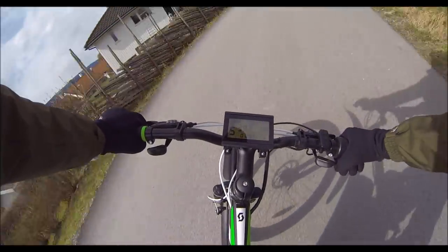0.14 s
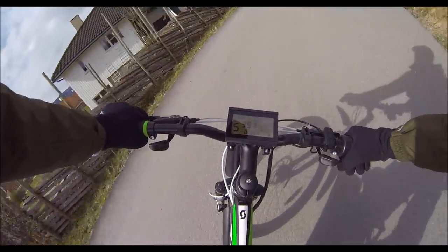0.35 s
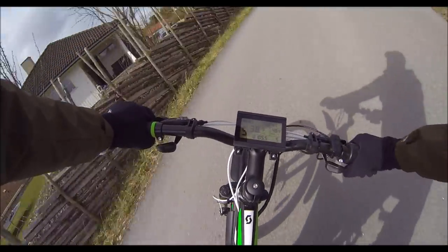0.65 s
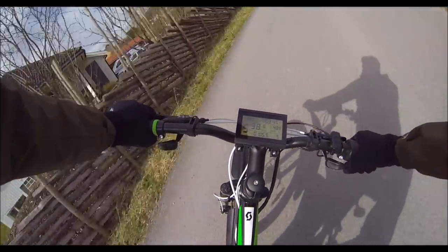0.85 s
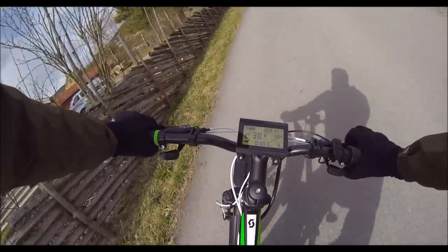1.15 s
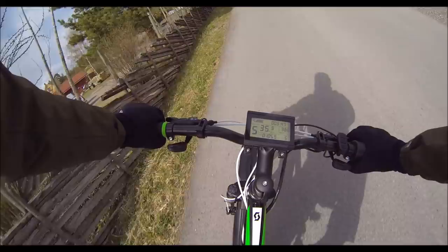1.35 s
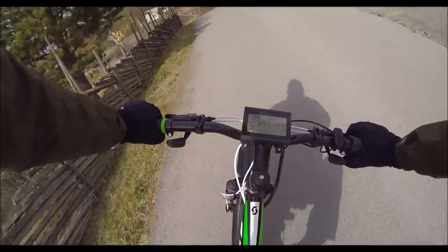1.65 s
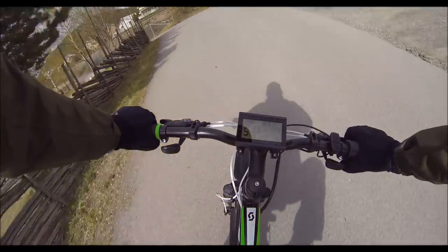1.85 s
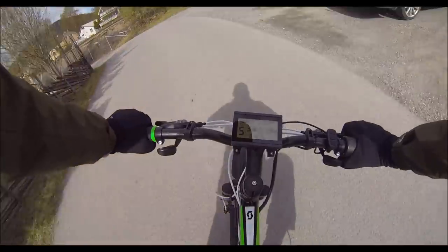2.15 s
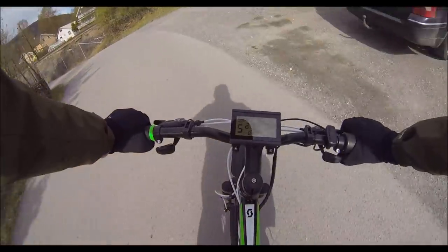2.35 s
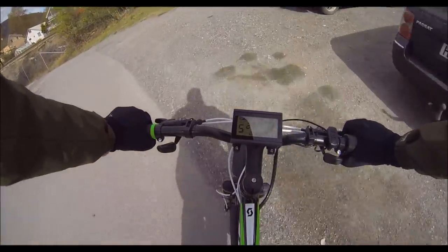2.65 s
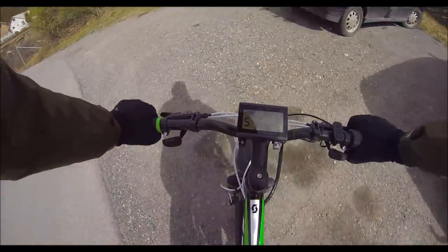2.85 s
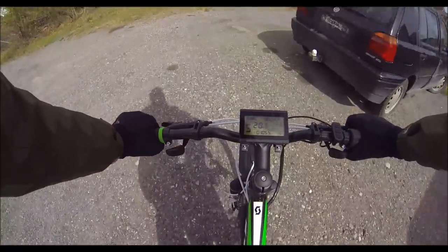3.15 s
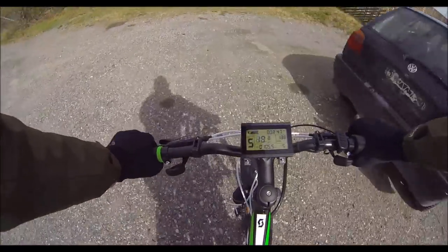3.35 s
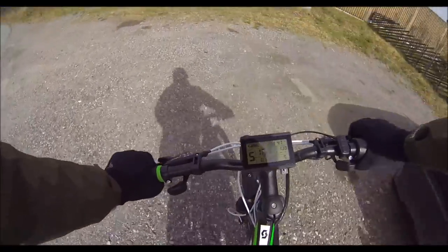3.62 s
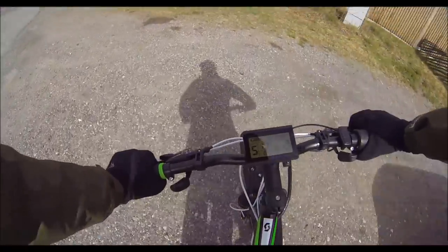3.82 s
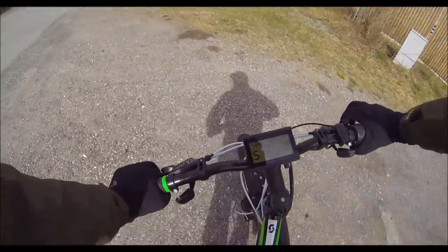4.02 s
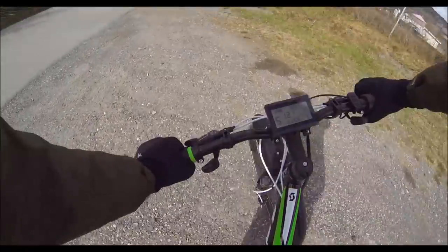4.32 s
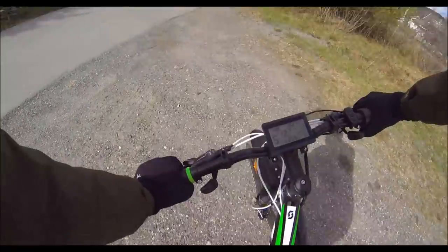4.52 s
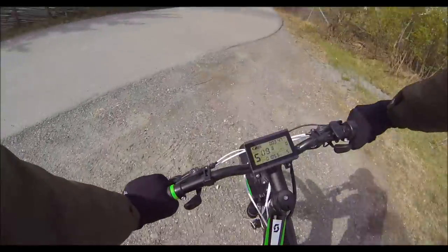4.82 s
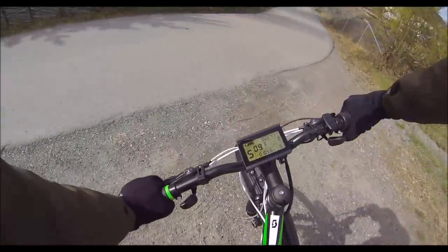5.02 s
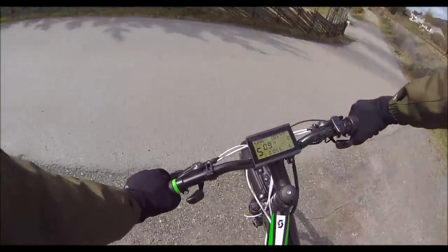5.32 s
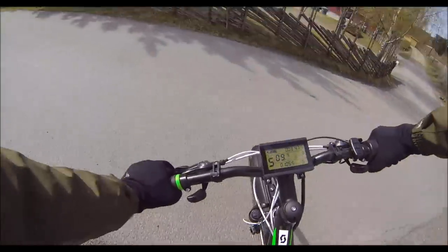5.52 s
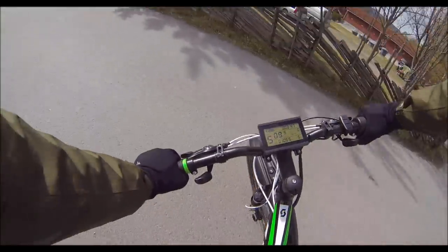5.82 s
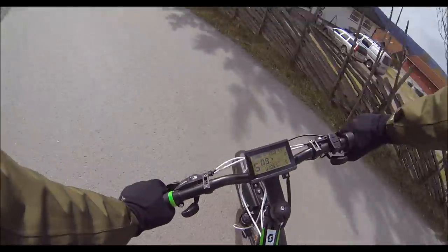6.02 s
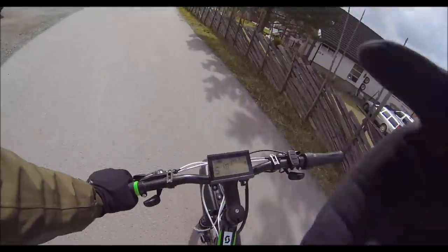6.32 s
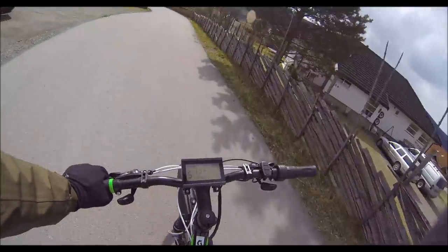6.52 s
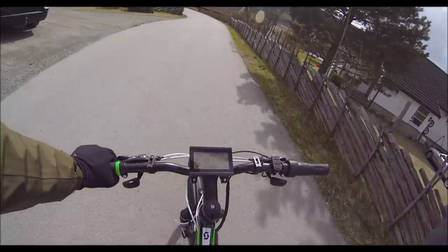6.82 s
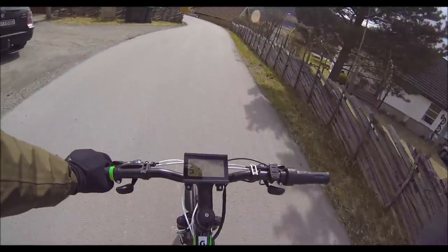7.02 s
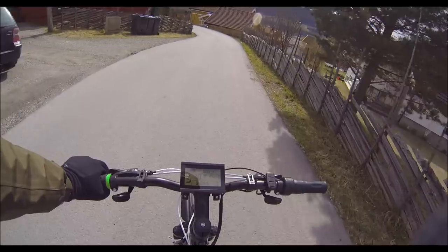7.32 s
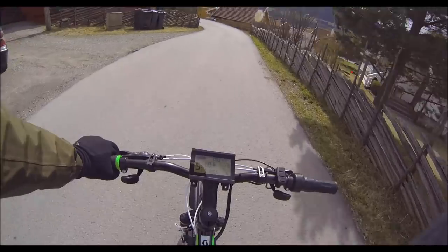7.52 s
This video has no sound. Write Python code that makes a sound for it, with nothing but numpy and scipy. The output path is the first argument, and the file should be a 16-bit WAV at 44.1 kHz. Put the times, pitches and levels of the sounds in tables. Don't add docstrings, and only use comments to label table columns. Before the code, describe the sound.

From the start, deep irregular wind buffeting and a soft gusty roar press on a sealed plastic case worn on a cyclist's chest, over a boxy, mid-range tyre and motor buzz, faint airy hiss and a very faint pulsing high electronic whistle. Small frame knocks come at 1.3-1.7 seconds. From 1.9 to 2.7 the brakes sing in thin, juddering squeals with tiny upward-sliding chirps. At 2.85-3.2 a sharp knock and heavy, deep jolts mark rough gravel; brighter stony crackle and fork rattle follow, with squeaks near 3.6 and a clearer one at 4.0. Scattered knocks continue through 6.6. Then dry glove scrapes begin, a tap lands at 6.9, a hard cracking thump at 6.98, a low press at 7.07 and another huge thump at 7.26. Buzz turns muffled, with faint taps and a final rub at 7.65.

```python
import sys
import numpy as np
from scipy import signal
from scipy.io import wavfile
from scipy.ndimage import uniform_filter1d

SR = 44100
rng = np.random.default_rng(int(sys.argv[2]) if len(sys.argv) > 2 else 0)


def magnitude_from_level(level_db):
    exponent = np.asarray(level_db, float) / 20
    return 10 ** exponent


def inscribe(sig):
    pcm = np.round(np.clip(np.atleast_2d(sig).T, -1, 1) * 32767)
    wavfile.write(sys.argv[1], SR, pcm.astype(np.int16))


N = 337806

# time in seconds, gust strength in dB, airspeed in dB.
WIND_GUSTS = [(0.0, -31.5, 8.5), (0.42, -37.5, 4), (0.62, -35, 7), (1.2, -42, 4.5), (1.66, -30, 4.5),
              (2.05, -39, -0.5), (2.4, -33.5, 1), (2.72, -45.5, -3), (3.01, -25.5, 1.5), (3.5, -37, -1),
              (3.8, -32.5, -0.5), (4.35, -44, -2.5), (4.88, -34, 6), (5.25, -30, -2.5), (5.85, -41.5, 2),
              (6.61, -38.5, 7), (7.12, -39.5, 0.5), (7.66, -32, -5)]
# frequency in Hz, density in dB per Hz.
BUFFET_SPECTRUM = [(7.1, -27), (12, 6), (32, 0.5), (41, -5.5), (54, -15), (85, -20.5), (160, -38),
                   (210, -46.5), (350, -120)]
# frequency in Hz, density in dB per Hz.
ROAR_SPECTRUM = [(41, -39.5), (70, 2), (141, -4), (233, -15), (302, -13.5), (421, -22.5), (624, -29),
                 (1200, -31), (1560, -43), (2640, -120)]
# frequency in Hz, density in dB per Hz.
SEAM_SPECTRUM = [(3500, -22.5), (5200, -3), (5900, -5.5), (6500, -0.5), (7200, -7), (7800, -1),
                 (8600, -12.5), (11000, -11.5), (13200, -17), (14500, -14)]
# time in seconds, shaking in dB, looseness from 0 to 1.
ROAD_SURFACE = [(0.0, -55, 0.17), (0.7, -56, 0), (1.56, -57.5, 0.38), (2.4, -63, 0.66), (2.84, -63, 0.65),
                (2.885, -52, 0.52), (3.318, -59, 0.77), (3.704, -57.5, 0.62), (3.99, -64.5, 0.72),
                (4.302, -60, 0.67), (4.65, -63.5, 0.84), (4.92, -52, 0.81), (5.2, -63, 0.88),
                (5.6, -59, 0.66), (5.69, -65.5, 0.81), (6.04, -58.5, 0.72), (6.13, -65, .4),
                (6.43, -58, 0.82)]
# frequency in Hz, width in Hz, level in dB.
CASE_MODES = [(704, 87, -12.5), (1000, 96, -11.5), (1386, 235, -1.5), (1570, 192, 4), (1910, 210, -8.5),
              (2196, 440, -10.5), (2700, 800, -18), (3417, 710, -13), (4040, 930, -24.5),
              (4830, 940, -23.5), (6620, 1600, -38.5)]
# time in seconds, level in dB, fork ring in dB, low bump in dB.
FRAME_KNOCKS = [(1.2974, -45, -20, -12), (1.5046, -43, -20, -15), (1.6222, -42.5, -18, 2.5),
                (2.8487, -28.5, -3.5, -17), (3.0098, -46, -11, 11), (3.1448, -46, -2.5, -10),
                (3.2047, -40, -7, -15), (3.2678, -34, -11, -14), (3.6377, -41.5, -24, -22),
                (3.6693, -46, -20, -11), (3.851, -45, -6, 1), (3.923, -49, 3, -12), (4.0595, -41, -24, -29),
                (4.1853, -42, 6, -12), (4.393, -46, -3, -7), (4.8468, -48, -14, 10),
                (4.9233, -40.5, -14, 8.5), (5.1432, -44.5, -5, -6), (5.3044, -60, -5, 14),
                (5.426, -44, 2.5, -17), (5.605, -45, -5, -4), (6.0476, -40, -21, 10.5),
                (6.2538, -39, -29, 2), (6.4138, -45.5, -15, -5), (6.501, -43, -14, 6.5),
                (6.567, -52, -10, 20), (6.641, -40, -9, -26.5)]
# start in seconds, length in seconds, level in dB.
BRAKE_SQUEALS = [(1.963, 0.23, -60), (2.22, .06, -54), (2.298, 0.11, -57), (2.52, 0.2, -69),
                 (3.1, 0.11, -60.5), (3.254, 0.21, -61), (3.52, .18, -63.5), (3.76, .03, -62.5),
                 (3.896, .1, -66), (4.02, 0.079, -62.5)]
# peak in seconds, level in dB, pitch in Hz, glide in Hz per second.
PAD_SQUEAKS = [(1.89, -68, 12300, 5000), (1.92, -58, 12600, 5000), (2.11, -68, 12600, 3000),
               (2.137, -72, 13100, 5000), (2.2, -77, 14000, 9000), (2.411, -71, 13110, 9000),
               (2.46, -70, 13900, 3000), (2.5, -66, 13950, 7000), (2.53, -74, 14350, 3000),
               (2.626, -73, 13340, 12000), (2.733, -64, 13230, 3000), (2.776, -76, 13870, 8900),
               (3.153, -66, 13200, 100), (3.568, -51.5, 13200, 2000), (3.624, -61, 13460, 2000),
               (3.708, -74, 13720, 9000), (3.74, -68, 14350, 3000), (3.768, -65, 13950, 6000),
               (3.97, -46.5, 10580, 100), (4.061, -61, 10700, 12000), (4.085, -68, 11500, 5000)]
# time in seconds, change in dB of the shaking that gets through.
GLOVE_GRIP = [
    (6.95, 2),
    (6.99, 8),
    (7.124, 0),
    (7.254, -3.5),
    (7.4, -9),
    (7.62, -4),
]
# start in seconds, length in seconds, level in dB, relative grit in dB.
GLOVE_SCRAPES = [
    (6.64, 0.021, -34, -17),
    (6.703, 0.043, -32, -16),
    (6.8, 0.012, -28.5, -12.5),
    (6.883, 0.046, -34.5, -17.5),
    (7.65, .1, -33, -16),
]
# frequency in Hz, density in dB per Hz.
RUB_SPECTRUM = [(500, -29.5), (760, -19), (1130, -24), (1380, 1.5), (2050, -4), (2500, -14), (3000, -28),
                (5000, -50)]
# frequency in Hz, density in dB per Hz.
GRIT_SPECTRUM = [(2000, -39), (2900, -14), (3400, 1.5), (4300, -9), (5100, -9.5), (5600, -21), (6200, -10),
                 (8000, -33.5)]
# frequency in Hz, density in dB per Hz.
FIZZ_SPECTRUM = [(5000, -25), (7000, -5), (8000, -2), (9000, -9), (10500, -5), (13000, -18), (15000, -24)]
# time in seconds, level in dB, wall pitch in Hz, wall bump in dB.
FINGER_TAPS = [
    (6.8956, -24, 300, 2),
    (7.0683, -43, 229, 17.5),
    (7.1017, -39, 710, 3),
    (7.218, -34, 700, 7),
    (7.235, -48, 589, 8),
    (7.3124, -61, 700, 17),
    (7.3574, -51.5, 695, 10),
    (7.423, -54, 343, 7),
]
# time in seconds, level in dB, rise in ms, hold in ms, fall in ms.
AIR_PUSHES = [
    (2.874, -13.5, 10, 1.6, 3.3),
    (3.136, -8.5, 14, 3.8, 9.4),
    (6.8956, -13.5, 0.3, 0.11, 0.99),
    (6.9783, -1.5, 0.72, 0.32, 1.83),
    (7.064, -15, 7.47, 0.72, 1.1),
    (7.2559, -1, 1.34, 0.11, 1.17),
]
# time in seconds, level in dB, pitch in Hz, 60 dB decay in seconds.
WALL_SWINGS = [(2.889, -12.5, 30.3, 0.38), (3.01, -36, 16, 0.079), (3.105, -7, 11.4, 0.28),
               (3.16, -13, 19, 0.17), (5.76, -31.5, 110, 0.064), (6.045, -27.5, 99, 0.08),
               (6.565, -26, 73, 0.097), (6.63, -25.5, 74, 0.17), (6.899, -15, 72, 0.052),
               (6.982, -10.5, 49, 0.075), (7.072, -2, 34.2, 0.12), (7.259, 0.5, 39.6, 0.14)]
# time in seconds, ring in dB, ring pitch in Hz, ring decay in ms, crack in dB.
CASE_SLAPS = [(1.7399, -42.5, 3450, 3.2, -62), (1.305, -53, 4900, 1.8, -70), (3.0107, -30, 316, 3.3, -69),
              (5.305, -38.5, 298, 4.3, -75), (6.9784, 4, 2750, 0.33, -39), (6.9798, -1.5, 1500, 1.4, -60),
              (6.9796, -21, 760, 2.2, -70), (6.9802, -22, 4060, 1, -60), (7.2555, -18, 1000, 0.84, -60),
              (7.2565, -14.5, 1506, 2.1, -58), (7.2553, -36, 2400, 1.2, -40.5),
              (7.2798, -39, 3100, 1.1, -35)]
TREBLE_GAPS = [.355, .528, .866, 2.073, 2.465, 2.53, 2.724, 3.237, 3.98, 4.174, 4.28, 4.51, 5.22, 6.565]

CALM_DB = -58


def evened(x):
    return x / np.sqrt(np.mean(x ** 2) + 1e-20)


def read(points, hz):
    f, value = np.transpose(points)
    return np.interp(np.log(hz + 1), np.log(f + 1), value)


def along(rows, t):
    s, *columns = np.transpose(rows)
    return [np.interp(t, s, c) for c in columns]


def add(mix, s, sound):
    part = mix[round(s * SR):][:len(sound)]
    part += sound[:len(part)]


def drift(width, size=N):
    once = uniform_filter1d(rng.standard_normal(size), int(width))
    return evened(uniform_filter1d(once, int(width)))


def above(x, hz, order=2):
    return signal.sosfiltfilt(signal.butter(order, hz, "high", fs=SR, output="sos"), x)


def during(t, spans, ramp):
    inside = np.any([(t > a) & (t <= b) for a, b in spans], axis=0)
    return uniform_filter1d(1. * inside, int(ramp))


def surge(t, start, length, db, rise, fall):
    return db - rise * np.maximum(start - t, 0) - fall * np.maximum(t - start - length, 0)


def coloured(x, gain_db):
    hz = abs(np.fft.fftfreq(16384, 1 / SR))
    log_gain = np.log(magnitude_from_level(np.maximum(gain_db(hz), -100)))
    taps = np.fft.ifft(np.exp(np.conj(signal.hilbert(log_gain)))).real[:8192]
    lead = 8192 * (len(x) == N)
    return signal.oaconvolve(np.r_[x[len(x) - lead:], x], taps)[lead:lead + len(x)]


def case_db(hz):
    power = sum(magnitude_from_level(2 * db) / (1 + (2 * (hz - f) / w) ** 2) ** 2.11 for f, w, db in CASE_MODES)
    return 10 * np.log10(power)


def through_case(drive, bright_db):
    body = evened(coloured(drive, case_db))
    return body + (magnitude_from_level(bright_db) - 1) * above(body, 3480)


def ground(t):
    level_db, loose = along(ROAD_SURFACE, t)
    return level_db + along(GLOVE_GRIP, t)[0], loose


def electronics(t):
    hiss = magnitude_from_level(-80.5) * rng.standard_normal(N)
    pulses = np.exp(2.37 * np.cos(2 * np.pi * (24.0 * t + 0.33)) - 2.5)
    whistle = np.sin(2 * np.pi * np.cumsum(11150 + 120 * drift(60)) / SR)
    trace = magnitude_from_level(-101) * np.sin(2 * np.pi * 9090 * t)
    return hiss + magnitude_from_level(-79.5) * pulses * whistle + trace


def wind(t):
    buffet_db, speed_db = along(WIND_GUSTS, t)
    buffet = evened(coloured(rng.standard_normal(N), lambda hz: read(BUFFET_SPECTRUM, hz)))
    gusts = magnitude_from_level(2.0 * drift(1600) + 2.63 * drift(360))
    roar = evened(coloured(rng.standard_normal(N) * gusts, lambda hz: read(ROAR_SPECTRUM, hz)))
    shaking_db = along(ROAD_SURFACE, t)[0] - CALM_DB
    roar_db = -55 + speed_db + 0.32 * shaking_db
    return magnitude_from_level(buffet_db + 5.5) * buffet + magnitude_from_level(roar_db + 5.5) * roar


def air(t):
    db = -76 + 0.091 * along(WIND_GUSTS, t)[1] + 0.3 * (ground(t)[0] - CALM_DB)
    db += .6 * np.minimum(along(GLOVE_GRIP, t)[0], 0)
    rush = rng.standard_normal(N) * magnitude_from_level(2.4 * drift(990))
    return magnitude_from_level(db + 3.5) * evened(coloured(rush, lambda hz: read(SEAM_SPECTRUM, hz)))


def grit(per_s, spread_db, length):
    hits = rng.random(N) < per_s / SR
    size = magnitude_from_level(spread_db * np.minimum(rng.exponential(1, N), 4)) * hits
    envelope = signal.oaconvolve(size, np.exp(-np.arange(600) / length))[:N]
    return evened(envelope * rng.standard_normal(N))


def road(t):
    level_db, loose = ground(t)
    bright_db = -13.5 + 21.5 * loose - 0.37 * (level_db - CALM_DB)
    rattle_db = level_db - 30 + 27.5 * loose
    stones = np.clip(.2 + .3 * loose, 0, .9)
    buzz = rng.standard_normal(N) * magnitude_from_level(1.8 * drift(740))
    drive = np.sqrt(1 - stones ** 2) * evened(buzz) + stones * grit(120, 5.6, 140)
    rattle_hz, width_hz = 2340, 380
    fork = evened(coloured(drive, lambda hz: -20 * np.log10(1 + (2 * (hz - rattle_hz) / width_hz) ** 2)))
    return magnitude_from_level(level_db + 1.2) * through_case(drive, bright_db) + magnitude_from_level(rattle_db - 2.0) * fork


def knock(s, db, fork_db, low_db, bump_hz=247):
    t = np.arange(2000) / SR
    fading = np.exp(-t / .0035) * np.tanh(t / .001)
    phase = rng.random(3)
    upper_db = -7.5 + 0.75 * fork_db
    modes = [(1522 + 67 * rng.standard_normal(), 0), (2298, fork_db), (3350, upper_db)]  # Hz, dB
    ring = sum(magnitude_from_level(d) * np.sin(2 * np.pi * (f * t + p)) for (f, d), p in zip(modes, phase))
    rattle = through_case(rng.standard_normal(len(t)) * fading, upper_db + 15.5)
    bump = np.sin(2 * np.pi * bump_hz * t) * np.exp(-t * bump_hz / 1.3)
    return s - .001, magnitude_from_level(db + 3.0) * (1.03 * ring * fading + 0.074 * rattle + magnitude_from_level(low_db - 3.0) * bump)


def squeal(t):
    bite_db_per_s, let_go_db_per_s = 250, 300
    db = np.max([surge(t, *row, bite_db_per_s, let_go_db_per_s) for row in BRAKE_SQUEALS], axis=0)
    depth = .5 + .25 * drift(3000)
    judder = 1 + depth * np.cos(2 * np.pi * np.cumsum(52 + 10 * drift(2000)) / SR)
    turns = np.cumsum(2224 + 9 * drift(890) + 12 * drift(146)) / SR
    waver_db = 2.5 * drift(700)
    return np.sqrt(2) * magnitude_from_level(db + waver_db) * judder * np.sin(2 * np.pi * turns)


def squeak(s, db, hz, glide):
    t = np.arange(-.06, .06, 1 / SR)
    turns = np.cumsum(hz + glide * t + 80 * drift(60, size=len(t))) / SR
    flutter = magnitude_from_level(3.1 * drift(80, size=len(t)))
    level_db = surge(t, 0, .002, db - 1, 1400, 1000)
    return s + t[0], np.sqrt(2) * magnitude_from_level(level_db) * flutter * np.sin(2 * np.pi * turns)


def scrapes(t):
    slips = .7 * rng.standard_normal(N) * magnitude_from_level(2.5 * drift(200)) + .45 * grit(900, 3, 50)
    hiss = rng.standard_normal(N) * magnitude_from_level(1.9 * drift(150))
    tones = [(slips, RUB_SPECTRUM), (slips, GRIT_SPECTRUM), (hiss, FIZZ_SPECTRUM)]
    layers = [evened(coloured(x, lambda hz: read(tone, hz))) for x, tone in tones]
    slide_in, slide_out, last_in = 450, 333, 498
    rises = [slide_in * 3] + [slide_in] * (len(GLOVE_SCRAPES) - 2) + [last_in]
    shapes = np.array([surge(t, s, length, 0, rise, slide_out)
                       for (s, length, *_), rise in zip(GLOVE_SCRAPES, rises)])
    *_, db, grit_db = np.transpose(GLOVE_SCRAPES)[:, :, None]
    first = GLOVE_SCRAPES[0][0]
    worn_db = 20 * np.clip(t - first, 0, .35)
    fizz_db = -56.5 + 0.83 * shapes.max(0) - worn_db
    levels = [(shapes + db).max(0), (shapes + db + grit_db).max(0), fizz_db]
    touching = during(t, [(first - .002, GLOVE_GRIP[1][0]), (GLOVE_GRIP[4][0], 9)], 100)
    return touching * sum(magnitude_from_level(d) * x for d, x in zip(levels, layers))


def tap(s, db, wall_hz, wall_db):
    return knock(s, db, -20, wall_db, wall_hz)


def push(s, db, rise_ms, hold_ms, fall_ms):
    ms = np.arange(0, 40, 1000 / SR)
    rise = np.sin(np.pi / 2 * np.clip(ms / rise_ms, 0, 1)) ** 2
    fall = np.exp(-(np.maximum(ms - rise_ms - hold_ms, 0) / fall_ms) ** 2)
    return s, -magnitude_from_level(db) * rise * fall


def swing(s, db, hz, t60):
    t = np.arange(0, .35, 1 / SR)
    turns = hz * t / (1 + t / 0.17)
    return s, np.sin(2 * np.pi * turns) * magnitude_from_level(db - 60 * t / t60) * np.tanh(t / 0.00094)


def slap(s, ring_db, hz, ring_ms, crack_db):
    ms = np.arange(0, 15, 1000 / SR)
    ring = -np.sin(2 * np.pi * hz * ms / 1000) * np.exp(-ms / ring_ms) * np.tanh(ms / 0.23)
    crack = signal.lfilter([1], [1, -.6], rng.standard_normal(len(ms))) * np.exp(-ms / .5)
    return s, magnitude_from_level(ring_db) * ring + magnitude_from_level(crack_db) * crack


def scene():
    t = np.arange(N) / SR
    mix = electronics(t) + wind(t) + air(t) + road(t) + squeal(t) + scrapes(t)
    events = [(knock, FRAME_KNOCKS), (squeak, PAD_SQUEAKS), (tap, FINGER_TAPS),
              (push, AIR_PUSHES), (swing, WALL_SWINGS), (slap, CASE_SLAPS)]
    for source, table in events:
        for row in table:
            add(mix, *source(*row))
    return mix[None]


def top_cut(x):
    return signal.sosfilt(signal.butter(12, 15300, fs=SR, output="sos"), x)


def record(dry):
    t = np.arange(N) / SR
    x = dry / (1 + dry ** 8) ** (1 / 8)
    top = above(x, 12750, order=20)
    power = uniform_filter1d(top[0] ** 2, 1024)
    squeaking = during(t, [(s - .07, s + .05) for s, _, hz, glide in PAD_SQUEAKS if glide > 1000], 1)
    faint = (power < magnitude_from_level(2 * 5) * np.median(power)) & (squeaking < .5)
    flickering = drift(1700) > .2 - .8 * ground(t)[1]
    x = x - uniform_filter1d(1. * (faint & flickering), 300) * top
    gaps = during(t, [(s - .012, s + .012) for s in TREBLE_GAPS], 300)
    x = x - .85 * gaps * above(x, 3800, order=6)
    band_limit = signal.firwin(511, 15300, window=("kaiser", 7), fs=SR)
    x = signal.oaconvolve(x, band_limit[None], "same")
    return top_cut(x)


dry = scene()
out = record(dry)
inscribe(out)
```